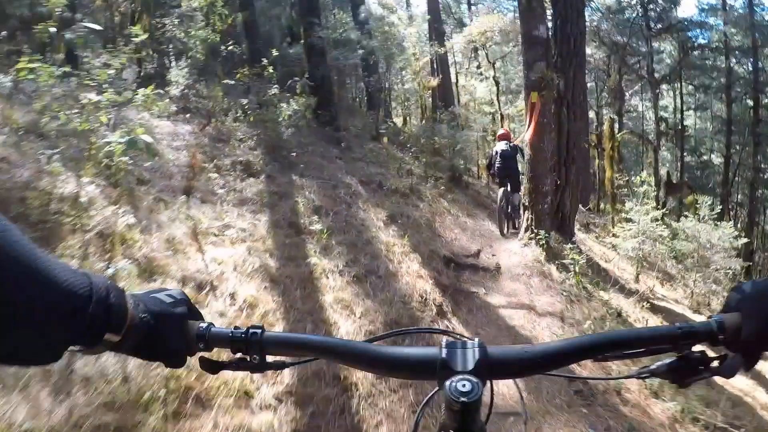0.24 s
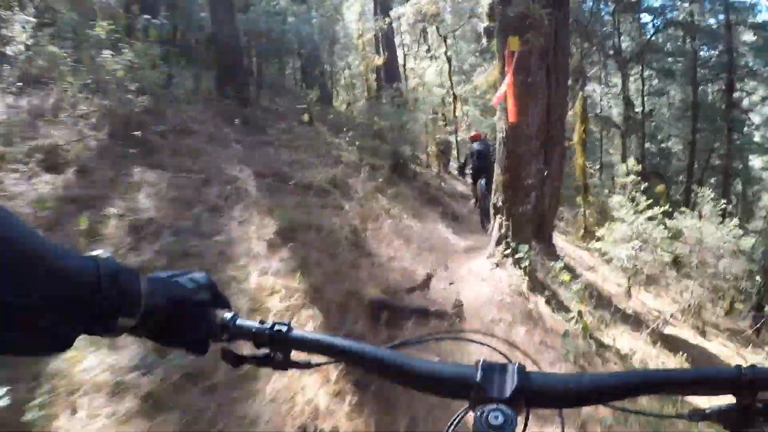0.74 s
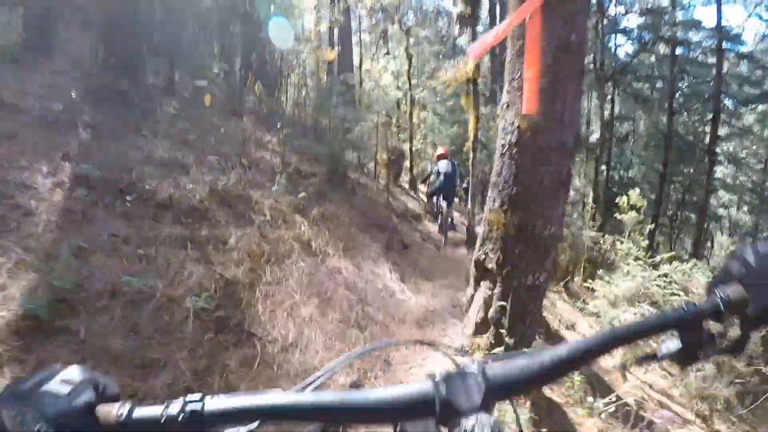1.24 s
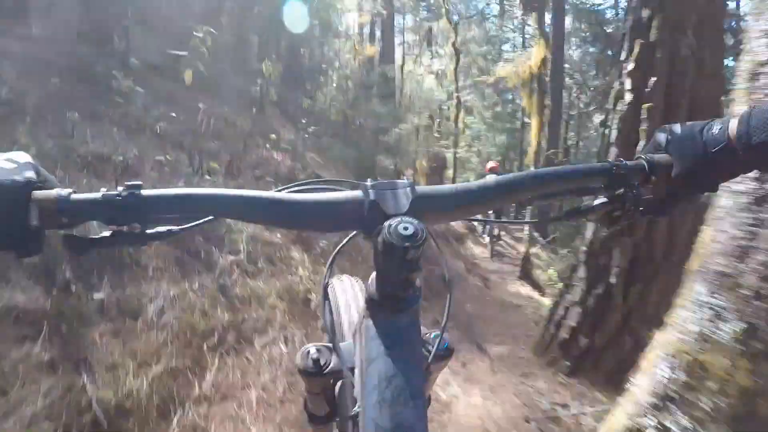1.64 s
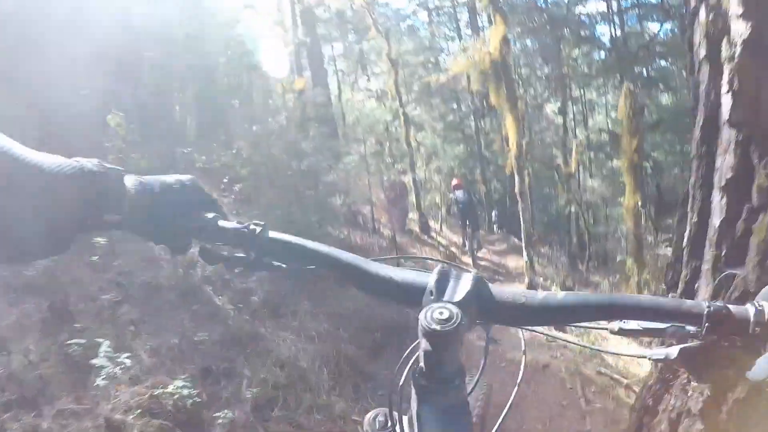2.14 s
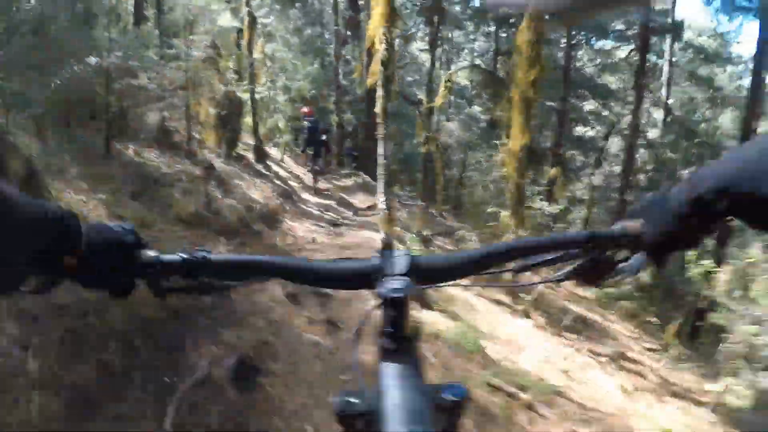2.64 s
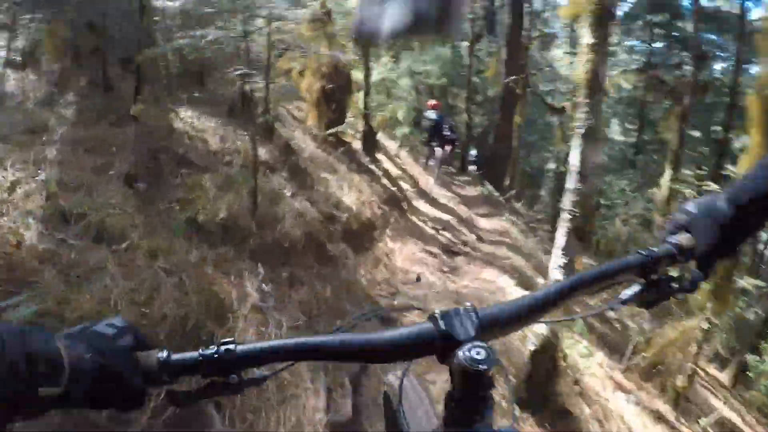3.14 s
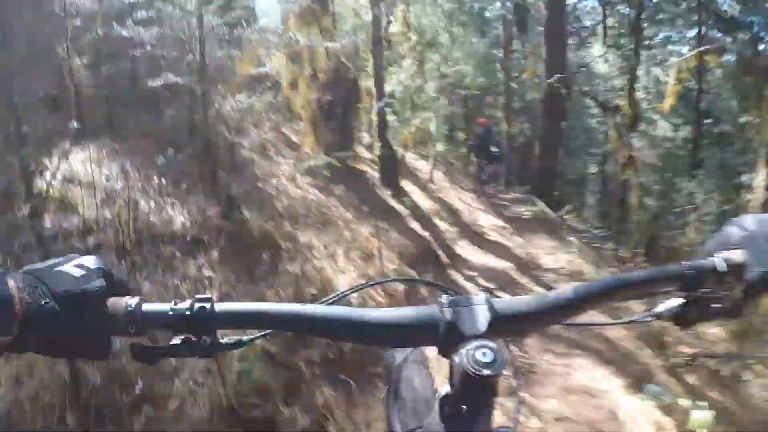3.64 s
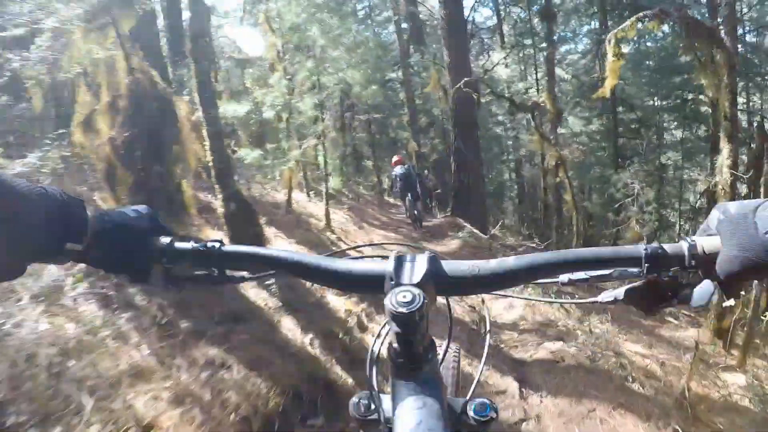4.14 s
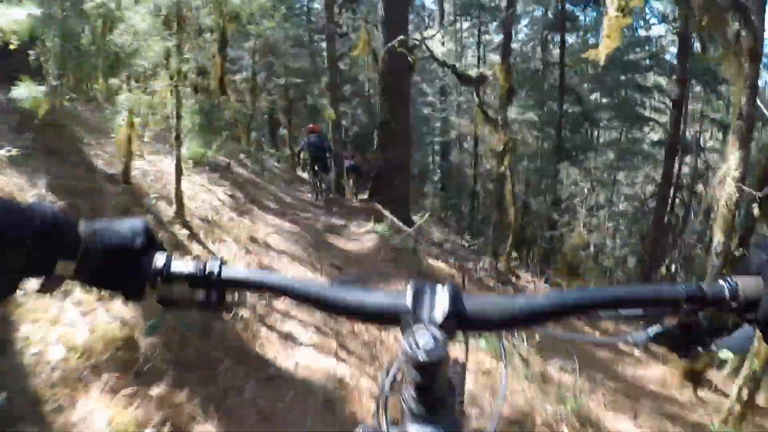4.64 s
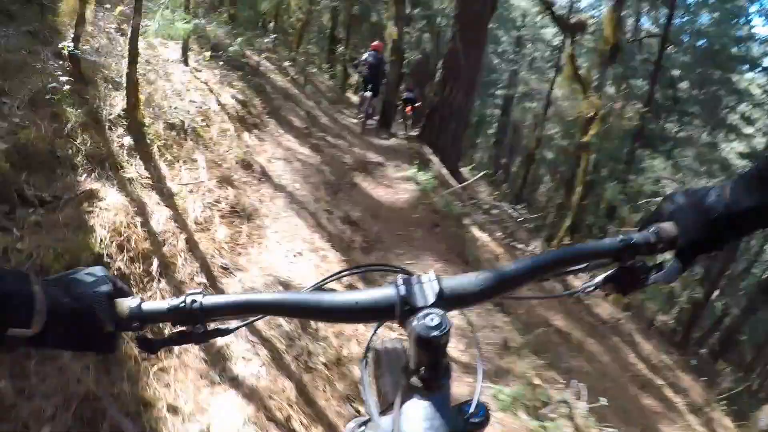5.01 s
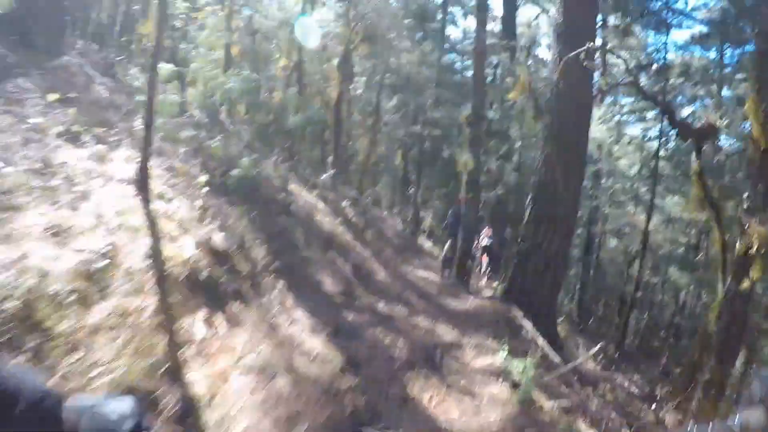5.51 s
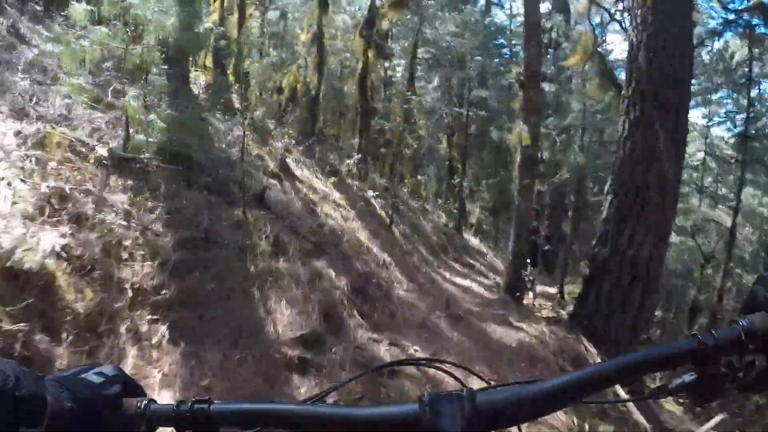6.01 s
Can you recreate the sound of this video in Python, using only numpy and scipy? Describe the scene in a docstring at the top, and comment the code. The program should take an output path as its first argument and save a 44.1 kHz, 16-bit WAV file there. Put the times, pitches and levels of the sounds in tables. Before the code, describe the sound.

A mountain bike rolls down a rough forest trail, heard close from a camera on the rider's chest. Deep, gusting wind buffets the microphone throughout, over tyre rumble that swells on each bump and a light crunch of dry litter. Twigs snap and the chain jangles in short, bright, irregular bursts. The first second is mono, with lighter knocks; by 1.4 seconds the sound opens into stereo and the rattling thickens. Hard, close knocks on the camera housing land at about 2.0 and 2.3 seconds, with the sharpest clack at 3.4 and more at 3.9 and 4.5. Dull bass thumps and smaller rattles fill the gaps, and a bright chain jangle stands out at 5.2. The crunch grows a little louder before a last hard knock and crack at 5.9 seconds. The wind and tyres then ease off, ending around 6.3 seconds.

```python
"""A rough forest trail: a bicycle rolls downhill, heard by a small camera on the rider's chest.
Wind buffets the two microphone ports, bumps knock the housing, tyre knobs shake the frame.
Dry litter crunches under the tyres, twigs snap, the chain jangles. The camera starts on one
microphone and widens to two; its limiter ducks the sound at the hardest knocks."""
import sys
import numpy as np
from scipy import signal
from scipy.io import wavfile
from scipy.ndimage import minimum_filter1d

SR = 44100
rng = np.random.default_rng(int(sys.argv[2]) if len(sys.argv) > 2 else 0)


def inscribe(sig):
    """Save sig as 16-bit PCM at rate SR to the path in sys.argv[1].

    A 1-D sig is mono; a 2-D sig holds one channel per row.
    Samples are clipped to [-1, 1] before scaling.
    """
    pcm = np.round(np.clip(np.atleast_2d(sig).T, -1, 1) * 32767)
    wavfile.write(sys.argv[1], SR, pcm.astype(np.int16))


N = 276507

# louder crackles of twigs and chain: (time [s], level [dB], jangle centre [Hz])
TWIG_CRACKLES = [(0.051, -36, 4750), (0.1096, -33, 3800), (0.1239, -22.5, 3500), (0.1494, -35, 3720),
                 (0.2085, -29, 3480), (0.2274, -36, 3490), (0.2567, -43, 4700), (0.329, -41, 4910),
                 (0.4775, -36, 3820), (0.609, -33.5, 4900), (0.7228, -39, 4570), (0.9494, -18, 4560),
                 (1.093, -34.5, 4540), (1.3359, -26.5, 6850), (1.3865, -25.5, 6700), (1.4246, -22, 7200),
                 (1.4375, -25, 7600), (1.528, -40, 11000), (1.6875, -17.5, 7200), (1.828, -30, 3620),
                 (1.837, -31.5, 6170), (1.8727, -27.5, 7020), (1.9866, -22.5, 7390), (2.0198, -14, 3300),
                 (2.031, -15.5, 8200), (2.1104, -41, 7400), (2.2153, -25.5, 5800), (2.287, -36, 6820),
                 (2.3003, -17.5, 3200), (2.4563, -34, 6910), (2.604, -27.5, 7000), (2.6365, -17, 6360),
                 (2.655, -29, 7590), (2.994, -26, 6660), (3.0036, -23, 3660), (3.052, -30, 6670),
                 (3.113, -33, 7000), (3.128, -29, 7000), (3.1474, -24, 6460), (3.263, -33, 6760),
                 (3.3358, -29, 3470), (3.3543, -24.5, 3450), (3.484, -29, 7470), (3.548, -32, 7400),
                 (3.604, -19, 7660), (3.6656, -32.5, 7720), (3.932, -26, 3240), (4.211, -20.5, 7800),
                 (4.473, -27, 6990), (4.523, -21, 3640), (4.6307, -26, 7600), (4.6512, -23, 6300),
                 (4.689, -39, 7280), (4.7461, -24, 7500), (4.8576, -22, 7040), (4.863, -27, 7610),
                 (4.8824, -40, 3520), (4.9092, -35, 7730), (4.9322, -39, 6880), (4.9507, -19.5, 6050),
                 (5.018, -24, 3480), (5.1872, -12, 7000), (5.247, -34, 10500), (5.2717, -25, 6900),
                 (5.303, -38, 7000), (5.3557, -30, 6160), (5.3673, -24.5, 6650), (5.3906, -29, 3480),
                 (5.4181, -27, 7350), (5.4939, -27, 7300), (5.6022, -26.5, 7900), (5.6335, -24.5, 7760),
                 (5.6814, -24, 7320), (5.697, -17, 7900), (5.8651, -28, 7370), (5.9213, -6, 3350)]
# fade from one microphone to two: (time [s], two-microphone share [0..1])
STEREO_WIDTH = [(1.06, 0.00072), (1.2, 0.44), (1.42, 0.98)]


def wind(bump_db):
    """Turbulence, separate at each port; deep and upper bands swell apart, bumps lift both."""
    # gusts: (time [s], deep level [dB], upper level [dB], left minus right [dB])
    gusts = [(0.0, -33, -15, 0.0), (0.03, -16, -28, -5.5), (0.16, -16, -36, 5.5), (0.21, -25, -31, -7),
             (0.49, -19, -36.5, -1), (0.63, -27, -40, 0), (0.89, -22, -51, -3), (1.06, -26, -48, 4),
             (1.1, -15, -26.5, 4), (1.19, -24.5, -35, 4), (1.48, -17, -24, -5), (1.66, -14.5, -24.5, -3.5),
             (1.73, -13.5, -30.5, -8.5), (1.87, -16.5, -23, -1.5), (1.9, -11.5, -28.5, -9),
             (2.01, -19.5, -20, 4), (2.04, -10.5, -24.5, -11), (2.13, -20.5, -48, -10),
             (2.18, -19, -24, -1.5), (2.78, -15.5, -27.5, -7.5), (2.81, -12.5, -18.5, 0),
             (3.0, -20, -22, 0), (3.04, -15, -42, -8), (3.12, -15, -24.5, -4.5), (3.39, -19.5, -23, -5),
             (3.42, -27, -41, -5), (3.46, -14, -33, -16.5), (3.56, -20.5, -23.5, 0.5), (3.72, -16, -29, -7),
             (3.98, -23.5, -29, 2), (4.43, -17, -29.5, -4), (4.52, -19, -20.5, 2), (4.61, -22.5, -29.5, 1),
             (4.7, -16, -23, -11), (4.8, -19.5, -32.5, -3), (4.94, -13.5, -31.5, -9),
             (4.99, -14.5, -46, -9.5), (5.03, -28, -27.5, -11), (5.12, -14.5, -37.5, -12.5),
             (5.2, -18, -27.5, -6.5), (5.29, -14.5, -27.5, -8), (5.48, -18, -27, -3), (5.52, -20, -24, -15),
             (5.55, -16.5, -33, -7), (5.61, -21, -40, -10), (5.66, -18, -20, 0.5), (5.71, -18.5, -38, -2.5),
             (5.92, -16, -28.5, -9.5), (5.95, -21, -15.5, -10), (5.99, -17, -26.5, -10),
             (6.15, -36.5, -59, 1), (6.27, -26.5, -30.5, -8)]
    # turbulence spectrum: (frequency [Hz], level [dB])
    spectrum = [(8.8, -6), (15, 7), (28, 4.5), (81, -5.5), (230, -19), (408, -33.5), (530, -43), (600, -43),
                (780, -57)]
    split_hz, buffet_db, sway_db = 87, 2.0, 1.5
    lift_db = 0.18 * bump_db + buffet_db * drift(per_s=6.7)
    deep_db, upper_db, pan_db = in_time(gusts)
    pan_db = pan_db + sway_db * drift(per_s=3.9)
    air = [coloured(rng.standard_normal((2, N)), spectrum, flicker_db=2.0, per_s=10.6) for _ in range(2)]
    deep = rms_one(butter(air, 3, split_hz, "low"))
    upper = rms_one(butter(air, 3, split_hz, "high"))
    port_gains = from_db(lift_db + np.array([pan_db, -pan_db]) / 2)
    return port_gains * (from_db(deep_db) * deep + from_db(upper_db) * upper)


def knocks(rumble_db):
    """Knocks and random rattles ring the housing modes near their pitch. Returns (alike, opposed)."""
    # hard knocks: (time [s], alike level [dB], opposed level [dB], centre [Hz], reach [octaves])
    hard = [(0.045, -19.5, -16, 950, 1.15), (0.257, -25, -32, 594, 2.3), (0.4, -12.5, -35, 482, 1.3),
            (0.415, -20, -22, 506, 0.96), (0.543, -16, -11, 960, 1.2), (0.558, -9.5, -14, 1280, 0.76),
            (0.645, -24, -36, 800, 0.29), (0.697, -25, -34, 840, 1.1), (0.812, -19.5, -34, 770, 0.92),
            (0.951, -30, -31, 1900, 1.2), (1.09, -22, -34, 450, 1.1), (1.451, -18.5, -8.5, 533, 0.94),
            (1.506, -17, -8, 540, 0.8), (1.621, -15, -3.5, 443, 1.34), (1.637, -22, -7, 500, 0.91),
            (1.679, -22, -5, 534, 1.1), (1.7, -19, -11, 520, 0.64), (1.8, -13, -24, 1040, 0.62),
            (1.833, -8, -32, 900, 0.84), (1.862, -18.5, -20, 1000, 0.64), (1.89, -18, -20, 1190, .8),
            (1.921, -24, -16, 890, 0.6), (2.0201, 8.5, 20, 1560, 1.64), (2.032, -2.5, 12, 1500, 1),
            (2.3016, 12.5, 7, 1870, 0.88), (2.465, -21.5, -23, 1850, 1.1), (2.655, -15, -3, 830, 2.1),
            (2.996, -20, -21, 700, 1.3), (3.007, -13.5, -28, 2270, 0.29), (3.078, -19.5, -20, 870, 2.2),
            (3.132, -11, -33, 1020, 1.37), (3.262, -23, -22, 1600, 0.3), (3.28, -13, -27, 454, 0.33),
            (3.346, -19.5, -22, 1700, 0.53), (3.391, 27.5, 28, 2660, 1.23), (3.377, -28, -14, 2000, .6),
            (3.465, -17, -13, 1620, 0.68), (3.566, -15.5, -12, 806, 1.6), (3.603, -40, -13, 3630, 1),
            (3.712, -18.5, -7, 477, 0.96), (3.933, 7, 21, 1390, 1.38), (4.24, -22.5, -27, 1770, 0.57),
            (4.5239, 14, 21, 1050, 0.85), (4.71, -28, -10, 350, 1.9), (4.855, -21.5, -17, 310, 2.2),
            (5.098, -19, -32, 1090, 0.85), (5.113, -20.5, -43, 1180, 1.4), (5.154, -18.5, -23, 402, 0.51),
            (5.188, -19, -22, 1500, 1), (5.191, -10, -19, 526, 0.51), (5.261, -15, -8, 605, 0.53),
            (5.282, -19, -8, 544, 1.37), (5.41, -15.5, -34, 503, 0.79), (5.418, -13, -36, 600, 0.84),
            (5.419, -15.5, -35, 2570, 0.24), (5.516, -3, -18, 775, 0.51), (5.563, -19.5, -8, 634, 0.5),
            (5.635, -19, -9, 453, 1.2), (5.665, -18.5, -10, 576, 0.71), (5.715, -14.5, -38, 1250, 1.16),
            (5.827, -17.5, -9, 523, 1.03), (5.912, -12, -7, 720, 0.34), (5.9225, 14, 20.5, 1000, 0.79),
            (5.939, -7, 9, 900, 0.71), (5.969, -9, 12, 1280, 1.03)]
    # housing modes: (frequency [Hz], level [dB], t60 [s])
    modes = [(152.5, 6.5, 0.14), (208, 7.5, 0.051), (323, 3.5, 0.052), (415.5, 3.5, 0.033),
             (565, 1.5, 0.018), (639, 0.5, 0.027), (792, -1, 0.017), (940, 1.5, 0.012), (1105, 2, 0.0081),
             (1581, -1, 0.015), (1995, -3.5, 0.014), (2525, -1, 0.011), (3420, -2.5, 0.0089),
             (4240, -13, .006), (5850, 0, 0.0046), (7200, -20, .005)]
    rattle_hz, opposed_hz, db_per_octave, shove_s = 563, 650, 38, 0.0001
    rebound_s, rebound_db, rebound_cap_db = 0.009, -6.5, -15
    s, db = scattered(per_s=8, level_db=rumble_db + 10, spread_db=5)
    rattles = [s, db, db + 12.5, rattle_hz * 2 ** rng.normal(0, 0.76, len(s)), np.full(len(s), 0.7)]
    s, alike_db, opposed_db, centre_hz, octaves = np.hstack([np.transpose(hard), rattles])
    # each hit rebounds once
    s = np.append(s, s + rebound_s * rng.uniform(0.225, 1, len(s)))
    alike_db = np.append(alike_db, np.minimum(alike_db + rebound_db, rebound_cap_db))
    opposed_db = np.append(opposed_db, np.minimum(opposed_db + rebound_db, rebound_cap_db))
    centre_hz, octaves = np.tile(centre_hz, 2), np.tile(octaves, 2)
    shove_hz = opposed_hz * 2 ** (opposed_db / db_per_octave)   # harder is brighter
    scatter_db = 3.05 * rng.standard_normal((len(s), len(modes), 2))
    direction = rng.choice([-1, 1], len(s))
    alike, opposed = np.zeros((2, N))
    for k, (hz, mode_db, t60_s) in enumerate(modes):
        strike_db = alike_db - 9.5 + np.maximum(-6 * (np.log2(hz / centre_hz) / octaves) ** 2, -36)
        shove_db = opposed_db - 12.5 + np.maximum(-18 * np.log2(hz / shove_hz) ** 2, -36)
        strikes = impulses(s, (-1) ** k * from_db(strike_db + mode_db + scatter_db[:, k, 0]))
        shoves = impulses(s, direction * from_db(shove_db + mode_db + scatter_db[:, k, 1]))
        shoves = smooth(smooth(shoves, shove_s), shove_s)   # softer push of the whole housing
        alike += ring(strikes, hz, t60_s)
        opposed += ring(shoves, hz, t60_s)
    return alike, opposed - 0.34 * alike   # knocks reach the right port more


def thumps():
    """Thumps of air and jolts: a few dying bass cycles of either sign, with a soft start."""
    # thumps: (time [s], level [dB], pitch [Hz], left minus right [dB])
    jolts = [(0.024, -14.5, 196, 8), (0.096, -22, 124, 0.0), (0.397, -12.5, 123, -1),
             (1.614, -19.5, 119, 9), (1.758, -18, 91.5, -10), (1.833, -10, 109, -8), (2.259, -15, 153, 7),
             (2.297, -15, 137, 1.0), (2.426, -14.5, 91.5, -21), (2.578, -14, 91.5, 0),
             (2.619, -10, 89.5, 1), (2.74, -14, 117, -6.5), (3.123, -22, 194, 0.5), (3.221, -14.5, 156, 14),
             (3.322, -18, 154, -8), (3.829, -16, 96, -6), (3.929, -13, 161, -18), (4.122, -18, 98, -20),
             (4.522, -6, 156, 19), (4.683, -17, 91.5, -4.5), (4.854, -14, 91.5, -11), (4.92, -17, 135, -6),
             (5.188, -16, 91.5, -6), (5.341, -14.5, 94, -12), (5.498, -24, 116, -1), (5.634, -18.5, 157, 3),
             (5.822, -15.5, 102, 6), (5.92, -8, 129, -1.0)]
    rise_cycles, t60_cycles = 0.24, 7.7
    out, t = np.zeros((2, N + SR)), np.arange(SR // 8) / SR
    for s, db, hz, pan_db in jolts:
        envelope = np.minimum(t * hz / rise_cycles, 1) * from_db(-60 * t * hz / t60_cycles)
        thump = rng.choice([-1, 1]) * envelope * np.sin(2 * np.pi * hz * t)
        start = round(s * SR)
        out[:, start:start + len(t)] += from_db([[db + pan_db / 2], [db - pan_db / 2]]) * thump
    return out[:, :N]


def rumble(rumble_db):
    """Tyre knobs shake the frame; the housing drives the ports in opposition. Returns (alike, opposed)."""
    # rumble spectra, alike and opposed at the ports: (frequency [Hz], level [dB])
    alike_spectrum = [(120, -5), (200, 0), (692, -15), (835, -17.5), (1160, -23), (1910, -21), (2140, -25),
                      (2480, -35), (4000, -30.5), (5200, -62)]
    opposed_spectrum = [(120, -57), (200, 2), (469, -5), (538, -3), (878, -13.5), (1890, -11.5),
                        (2750, -38), (3480, -62)]
    shake = from_db(3.17 * drift(per_s=14.7))
    fine = shake * grit(per_s=150, spread_db=5.1, grain_s=0.0026, depth=0.24)
    alike = coloured(fine, alike_spectrum, flicker_db=3.0, per_s=9.8)
    coarse = shake * grit(per_s=120, spread_db=14.5, grain_s=0.0071, depth=0.91)
    opposed = coloured(coarse, opposed_spectrum, flicker_db=4.0, per_s=12.0)
    return from_db(rumble_db + 3.5) * alike, from_db(rumble_db + 6.0) * opposed


def crunch(crunch_db):
    """Dry litter under the tyres; crackles are bursts of the same noise. Returns (alike, opposed)."""
    # litter spectra on one microphone, and alike and opposed on two: (frequency [Hz], level [dB])
    mono_spectrum = [(1180, 6.5), (2000, -9.5), (2530, 1.5), (3140, -15.5), (4730, 4), (5580, -4.5),
                     (6140, -4), (7250, -14), (9090, -10.5), (14400, -20), (15300, -32), (16000, -53)]
    alike_spectrum = [(1180, -12.5), (2000, -3), (2140, -6), (2490, -3), (4990, -7.5), (7510, 1.5),
                      (8260, -6), (12900, -24), (13700, -33), (14900, -60), (16000, -63)]
    opposed_spectrum = [(2650, -49), (4500, -37), (5220, 0.5), (7330, 1), (9120, -1), (12900, -16),
                        (14300, -35), (14800, -56), (16000, -58)]
    faint = scattered(per_s=5.1, level_db=crunch_db + 9.5, spread_db=-2)
    s, db = np.hstack([np.transpose(TWIG_CRACKLES)[:2], faint])
    breaks = impulses(s, from_db(db))
    snaps = from_db(-12) * decay(breaks, t60_s=0.0097)
    tails = from_db(-16.5) * decay(breaks, t60_s=0.066)
    bursts = smooth(snaps + tails, tau_s=0.0011)
    bed = grit(per_s=300, spread_db=4.4, grain_s=0.0016, depth=0.37)
    bed *= from_db(crunch_db + 1.67 * drift(per_s=13.0))
    litter = bed + bursts * rng.standard_normal((2, N))
    litter_rms = np.sqrt(np.mean(litter ** 2))
    width = in_time(STEREO_WIDTH)[0]
    mono = coloured(litter * (1 - width), mono_spectrum, flicker_db=-1.0, per_s=21.0)
    alike = coloured(litter * width, alike_spectrum, flicker_db=2.0, per_s=17.4)
    decorrelated = litter[::-1] * rng.choice([-1, 1], N)
    opposed = coloured(decorrelated, opposed_spectrum, flicker_db=0.5, per_s=21.0)
    mono = port(mono, hz=9100, width_hz=1600, added_db=3.5)
    alike, opposed = port([alike, opposed], hz=7580, width_hz=500, added_db=0)
    return litter_rms * np.array([from_db(-14) * mono + from_db(0.4) * alike, from_db(-4) * opposed])


def chain():
    """The louder crackles jangle the chain, most in the modes near their centre pitch."""
    # chain modes: (frequency [Hz], level [dB], t60 [s])
    modes = [(3330, 1, 0.0086), (3590, -2.5, 0.021), (4466, -0.5, 0.011), (5150, -7, 0.0068),
             (6030, -4.5, 0.016), (6930, 1, 0.0081), (7680, -6, 0.025), (9660, -3.5, 0.009),
             (11100, -8, 0.0033), (13000, -5, .004)]
    gain_db, jangle_s = -8, 0.0029
    s, db, centre_hz = np.transpose(TWIG_CRACKLES)
    scatter_db = 2.84 * rng.standard_normal((len(s), len(modes)))
    pole = np.exp(-1 / (jangle_s * SR))
    out = np.zeros(N)
    for k, (hz, mode_db, t60_s) in enumerate(modes):
        off_centre_db = -9 * np.log2(hz / centre_hz) ** 2
        hits = impulses(s, from_db(db + gain_db + mode_db + off_centre_db + scatter_db[:, k]))
        envelope = np.sqrt(1 - pole ** 2) * signal.lfilter([1], [1, -pole], hits)
        out += ring(envelope * rng.standard_normal(N), hz, t60_s)
    return out


def ground():
    """Roots and stones lift the tyre noise in triangles of dB. Returns rumble, crunch and bump dB."""
    # ground between bumps: (time [s], rumble level [dB], crunch level [dB])
    trail = [(0.0, -46, -53), (0.12, -38, -54.5), (0.6, -39, -53.5), (1.06, -43, -54), (1.27, -47.5, -55),
             (1.5, -39.5, -53), (1.95, -41.5, -52), (2.08, -48, -59), (2.4, -50, -54.5), (2.83, -46, -55),
             (3.23, -42.5, -52.5), (3.6, -41, -55.5), (4.1, -51, -58), (4.4, -49, -56.5),
             (4.72, -45.5, -54.5), (5.05, -42, -51.5), (5.62, -45, -48.5), (5.83, -41, -45.5),
             (6.0, -50, -50.5), (6.27, -59, -64)]
    # roots and stones: (time [s], rumble rise [dB], half length [s])
    bumps = [(1.37, 9, 0.093), (1.67, 3.5, 0.091), (1.847, 8.5, 0.13), (2.034, 16.5, 0.076),
             (2.232, 8.5, 0.14), (2.657, 10, 0.24), (3.043, 10, 0.19), (3.137, 15.5, 0.075),
             (3.273, 12, 0.038), (3.386, 13, 0.066), (3.454, 3.5, 0.027), (3.95, 13, 0.075),
             (4.257, 7.5, 0.092), (4.52, 10, 0.17), (4.929, 15, 0.12), (5.2, 7, 0.16), (5.464, 13, 0.15),
             (5.702, 7.5, 0.077)]
    rumble_db, crunch_db = in_time(trail)
    t = np.arange(N) / SR
    bump_db = np.max([db * np.maximum(1 - np.abs(t - s) / half_s, 0) for s, db, half_s in bumps], axis=0)
    return rumble_db + bump_db, crunch_db + 0.48 * bump_db, bump_db


def port(x, hz, width_hz, added_db):
    """A microphone port resonates, adding a band of treble."""
    r = np.exp(-np.pi * width_hz / SR)
    poles = [1, -2 * r * np.cos(2 * np.pi * hz / SR), r * r]
    return x + from_db(added_db) * (1 - r * r) / 2 * signal.lfilter([1, 0, -1], poles, x)


def ring(x, hz, t60_s):
    """One mode: a unit impulse starts a dying sine of height 1."""
    r, w = from_db(-60 / (t60_s * SR)), 2 * np.pi * hz / SR
    return signal.lfilter([0, np.sin(w)], [1, -2 * r * np.cos(w), r * r], x)


def grit(per_s, spread_db, grain_s, depth):
    """Two noises whose level jumps and decays with each crushed grain."""
    crushed = (rng.random(N) < per_s / SR) * from_db(spread_db * np.minimum(rng.exponential(1, N), 4))
    grains = smooth(crushed + 1e-18, grain_s)
    return (1 + depth * rms_one(grains)) * rng.standard_normal((2, N))


def coloured(pair, spectrum, flicker_db, per_s):
    """Third-octave bands taken in turn from two noises, each flickering on its own; rms 1."""
    hz, db = np.transpose(spectrum)
    edges_hz = hz[0] * 2 ** np.arange(0, np.log2(hz[-1] / hz[0]) + .01, 1 / 3)
    out = np.zeros(N)
    for k, (low, high) in enumerate(zip(edges_hz, edges_hz[1:])):
        band_db = np.interp(np.log(low * high) / 2, np.log(hz), db) + flicker_db * drift(per_s)
        out += from_db(band_db) * butter(pair[k % 2], 2, [low, high], "band")
    return rms_one(out)


def drift(per_s):
    """Slow random curve of rms 1, changing about per_s times a second."""
    hop, settle = 40, 2000
    r = np.exp(-2 * np.pi * hop * per_s / SR)
    slow = signal.lfilter([1], [1, -2 * r, r * r], rng.standard_normal(N // hop + settle + 2))[settle:]
    return np.interp(np.arange(N) / hop, np.arange(len(slow)), rms_one(slow))


def scattered(per_s, level_db, spread_db):
    """Random events spread about a level curve: (time [s], level [dB])."""
    count = round(per_s * N / SR)
    s = rng.uniform(0, (N - 1) / SR, count)
    return s, level_db[(s * SR).astype(int)] + spread_db * rng.standard_normal(count)


def impulses(s, heights):
    """One-sample clicks at times s."""
    out = np.full(N, 1e-18)
    out[np.minimum(np.round(s * SR).astype(int), N - 1)] = heights
    return out


def decay(x, t60_s):
    """Give each impulse an exponential tail."""
    return signal.lfilter([1], [1, -from_db(-60 / (t60_s * SR))], x)


def smooth(x, tau_s):
    """One-pole low-pass."""
    r = np.exp(-1 / (tau_s * SR))
    return signal.lfilter([1 - r], [1, -r], x)


def butter(x, order, hz, kind):
    """Maximally flat filter."""
    return signal.sosfilt(signal.butter(order, hz, kind, fs=SR, output="sos"), x)


def in_time(rows):
    """Columns of a time table, one value a sample."""
    s, *columns = np.transpose(rows)
    return [np.interp(np.arange(N) / SR, s, column) for column in columns]


def from_db(db):
    """Decibels to gain."""
    return 10 ** (np.asarray(db) / 20)


def rms_one(x):
    """Scale to rms 1."""
    return x / np.sqrt(np.mean(x ** 2) + 1e-20)


def limiter(mix):
    """Peaks in the upper band duck that band fully and the bass in part."""
    limit_db, split_hz, bass_share = -1.5, 314, 0.36
    look_ahead_s, attack_s, hold_s, release_db_per_s = 0.0014, 0.0011, 0.029, 304
    bass = butter(mix, 2, split_hz, "low")
    upper = mix - bass
    over_db = 20 * np.log10(np.abs(upper).max(0) + 1e-9) - limit_db
    held_db = -minimum_filter1d(-over_db, round((hold_s + look_ahead_s) * SR))
    n = np.arange(N)
    ramp_db = release_db_per_s * n / SR
    released_db = np.maximum(np.maximum.accumulate(held_db + ramp_db) - ramp_db, 0)
    # delay the centred hold window so it opens look_ahead_s before a peak
    duck_db = np.interp(n - (hold_s - look_ahead_s) * SR / 2, n, smooth(released_db, attack_s))
    return upper * from_db(-duck_db) + bass * from_db(-bass_share * duck_db)


def scene():
    """Alike sound adds to both ports; opposed sound adds left and subtracts right."""
    rumble_db, crunch_db, bump_db = ground()
    alike, opposed = np.array(rumble(rumble_db)) + crunch(crunch_db) + knocks(rumble_db)
    alike = alike + chain()
    return wind(bump_db) + thumps() + [alike + opposed, alike - opposed]


def record(dry):
    """The camera widens from mono to stereo, limits, clips and cuts the top treble."""
    ceiling, cutoff_hz = 0.97, 16400
    mid = (dry[0] + dry[1]) / 2
    side = (dry[0] - dry[1]) / 2 * in_time(STEREO_WIDTH)[0]
    clipped = np.clip(limiter(np.array([mid + side, mid - side])), -ceiling, ceiling)
    return signal.sosfilt(signal.cheby2(12, 70, cutoff_hz, fs=SR, output="sos"), clipped)


dry = scene()
out = record(dry)
inscribe(out)
```